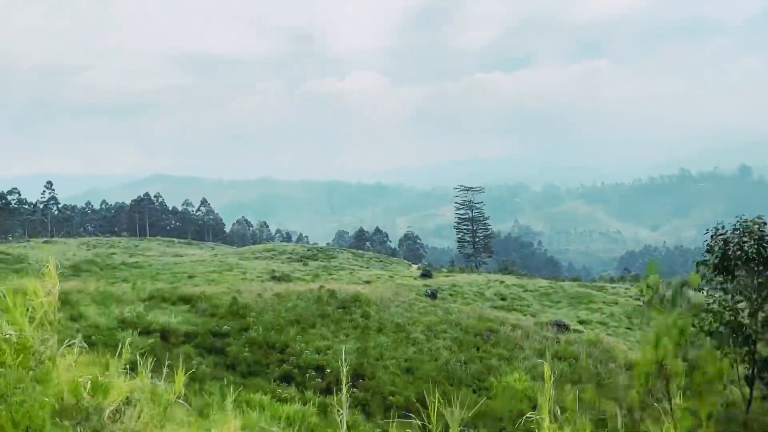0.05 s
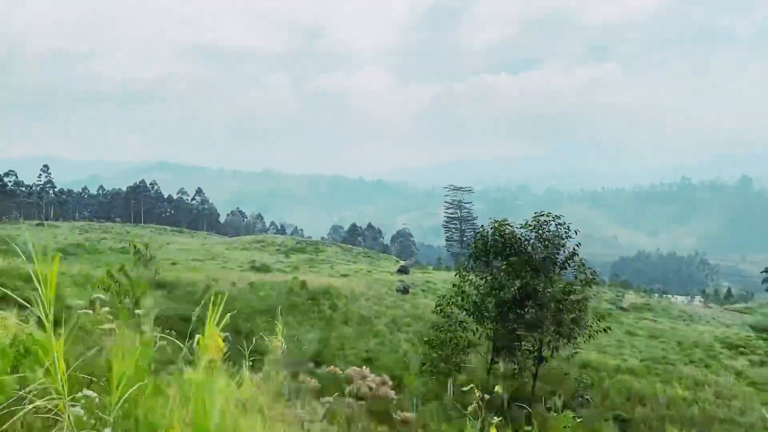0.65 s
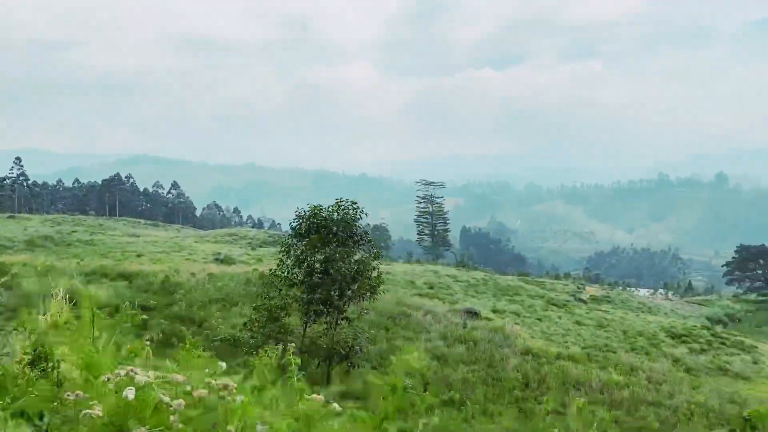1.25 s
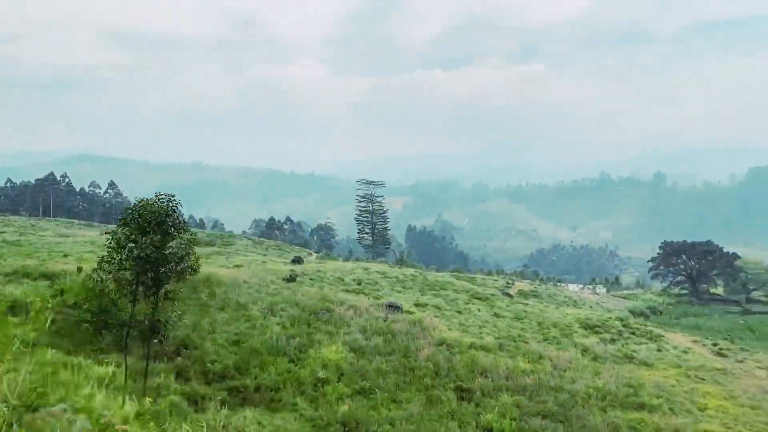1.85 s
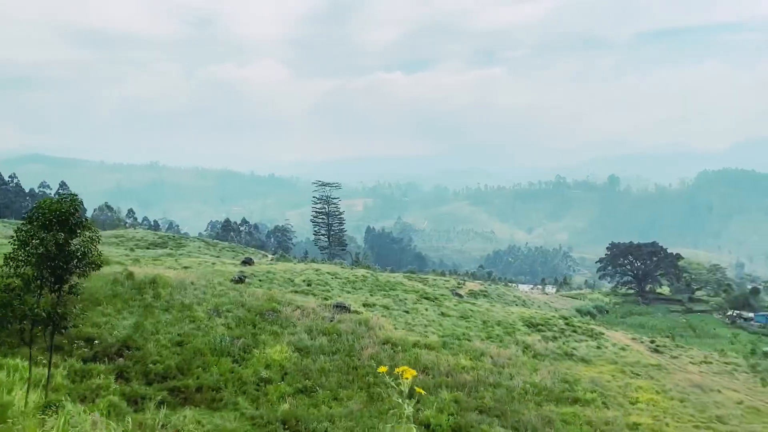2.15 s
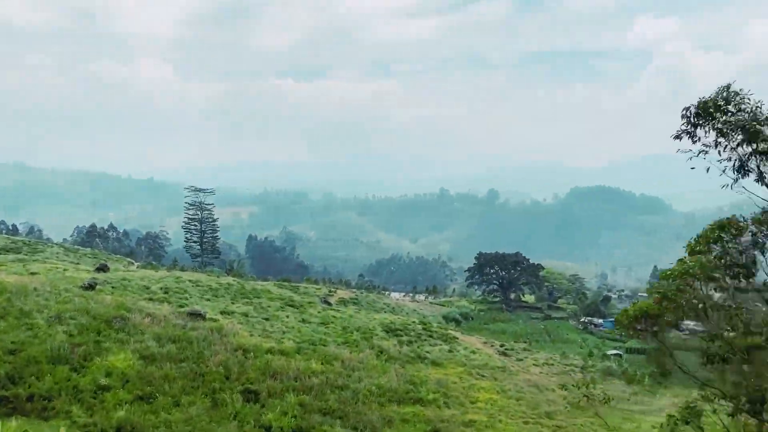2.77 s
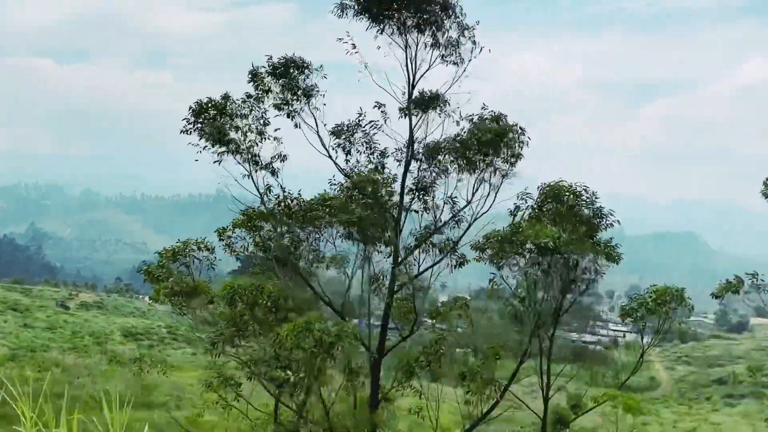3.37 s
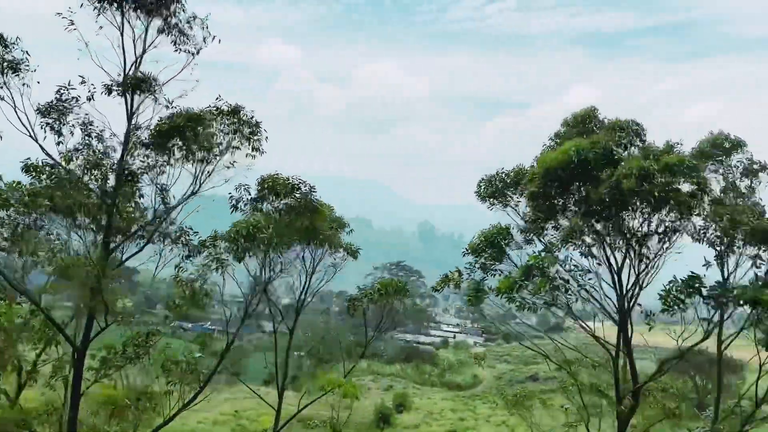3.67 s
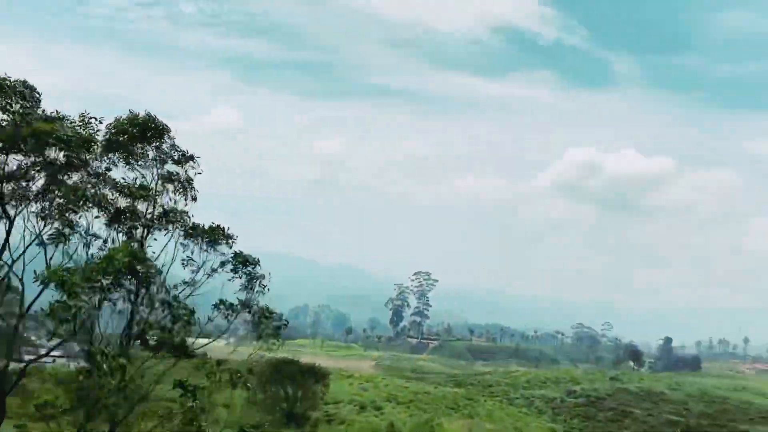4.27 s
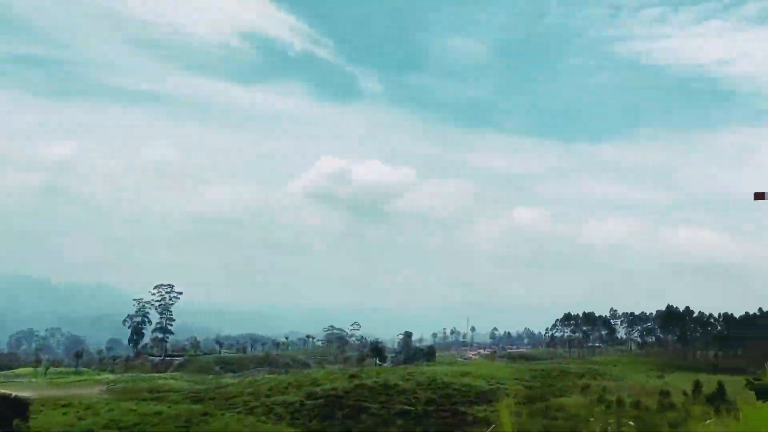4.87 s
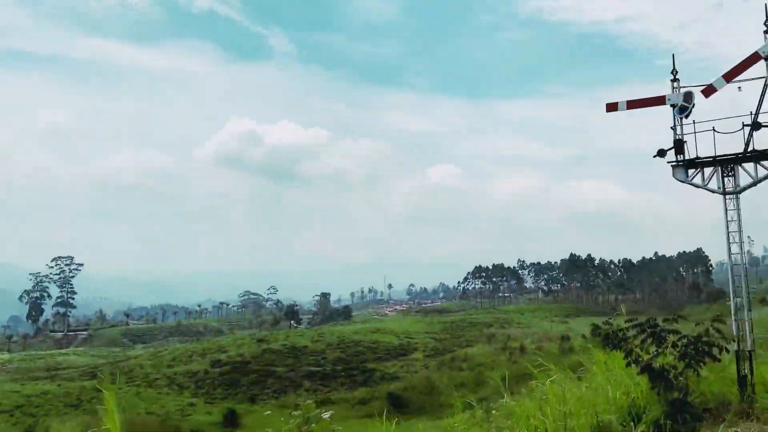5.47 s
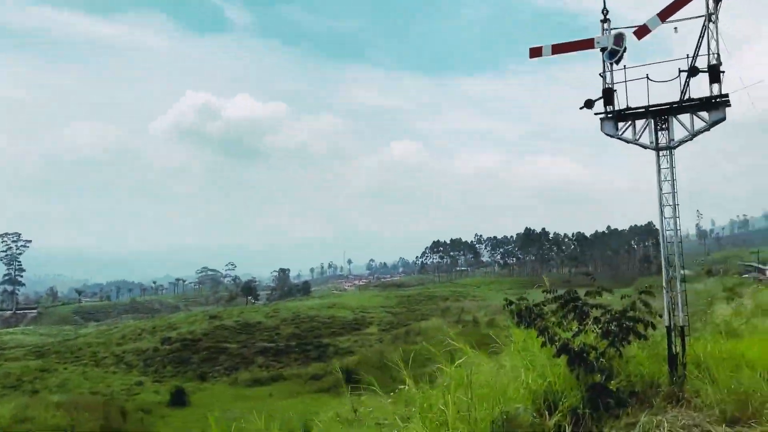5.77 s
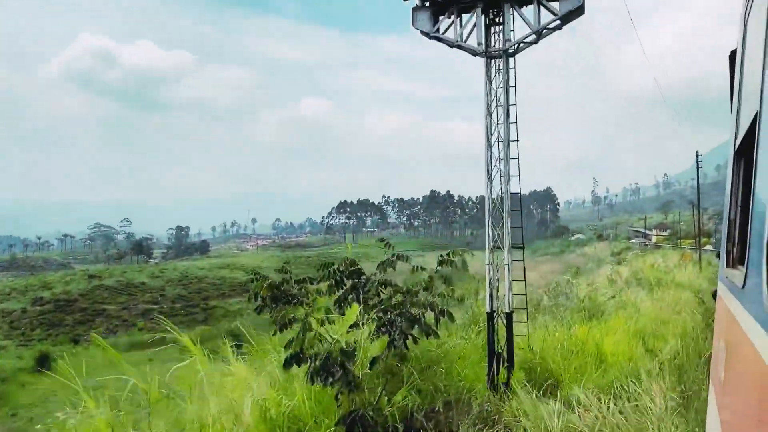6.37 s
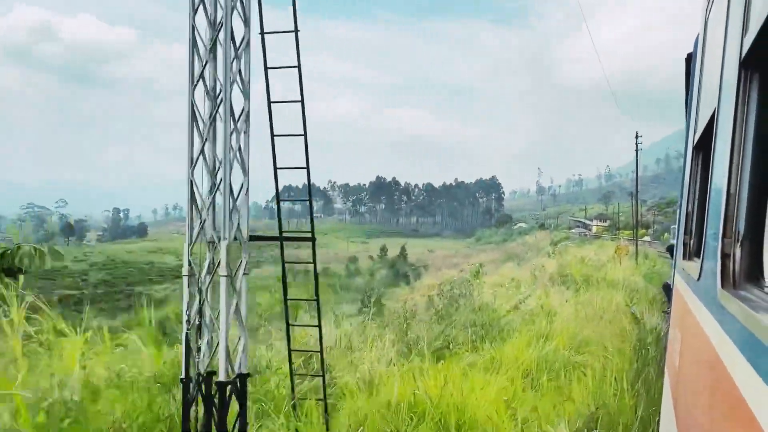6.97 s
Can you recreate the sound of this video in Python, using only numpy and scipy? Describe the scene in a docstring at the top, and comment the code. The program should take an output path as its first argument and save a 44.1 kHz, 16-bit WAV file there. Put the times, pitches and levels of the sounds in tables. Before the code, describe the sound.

A passenger train rumbles along, heard from an open window, with sharp irregular clacks at rail joints and wind buffeting the microphone.

```python
"""Jointed track from a train window

Stereo microphone at the open window of a passenger carriage, a short way above the wheels.
Wheels drop into the rail joints: a steel clack, a thud of the bogie and a hiss that dies slowly;
a squarely struck wheel clangs. Between the blows the wheels roar and loose gear rattles,
flanges squeak faintly on the rail, and the slipstream buffets the microphone."""
import sys
import numpy as np
from scipy import signal
from scipy.fft import rfft, irfft, next_fast_len
from scipy.io import wavfile
from scipy.ndimage import map_coordinates

SR = 44100
rng = np.random.default_rng(int(sys.argv[2]) if len(sys.argv) > 2 else 0)


def pcm_store(signal):
    """Save signal as 16-bit PCM."""
    levels = np.round(np.clip(np.atleast_2d(signal), -1, 1) * 32767)
    wavfile.write(sys.argv[1], SR, levels.astype(np.int16).T)


N = 313992
TIME = np.arange(N) / SR

# Levels are ahead of each layer's own gain; pan_db is left minus right.
# Wheel blows at rail joints, with smaller rattles and a scrape between them; a short rise is a hard knock:
# start_s, clack_db, clack_hz, rise_s, ring_t60_s, thud_db, hiss_db, hiss_tilt_db, pan_db
KNOCKS = [(0.032, -20, 855, 0.0079, 0.21, -25.5, -38, -1, 4.5),
          (0.101, -14, 750, 0.0036, 0.062, -30, -36.5, 2, 2),
          (0.178, -16.5, 800, 0.0032, 0.14, -26, -35, -2, 5),
          (0.263, -23, 874, 0.0083, .28, -25.5, -40, -2, 0.5),
          (0.323, -26, 920, 0.0074, .32, -22, -40, 1, 1),
          (0.425, -24.5, 750, 0.0011, 0.18, -26, -42, 1, 8.5),
          (0.665, -20.5, 890, 0.0018, 0.3, -19.5, -31, 3, 8),
          (0.726, -18.5, 760, 0.0015, 0.14, -17.5, -52, 0, 4),
          (0.872, -24.5, 820, .011, 0.069, -31, -37.5, 4, 4),
          (0.938, -28.5, 890, 0.0025, 0.32, -24.5, -43, 6, 3),
          (0.994, -16.5, 754, 0.00298, 0.088, -15.5, -35.5, -1, 3),
          (1.095, -31, 796, 0.0096, 0.33, -27.5, -41.5, -5, 3),
          (1.373, -26.5, 850, .0016, 0.21, -21, -40.5, -3, 6),
          (1.546, -26, 720, 0.0017, 0.15, -17.5, -34, -6, 2),
          (1.762, -26, 730, 0.0013, 0.22, -25.5, -48.5, -6, 5),
          (1.809, -23.5, 775, 0.0019, 0.32, -28.5, -32.5, -4, 1),
          (2.122, -28, 1090, 0.0047, 0.16, -18, -37.5, -8, 4),
          (2.296, -40, 940, 0.0032, 0.27, -30, -43.5, -10, 0),
          (2.331, -45, 1000, 0.0069, 0.18, -30, -45.5, -3, -1),
          (2.578, -19.5, 940, 0.0055, 0.21, -24, -32, -3.5, 3),
          (2.851, -17.5, 810, 0.002, 0.13, -23, -35, 0, 3),
          (3.026, -15, 646, 0.0014, 0.27, -17.5, -36.5, -9, 4.5),
          (3.301, -21.5, 940, .004, 0.3, -21, -35.5, -1, 3),
          (3.61, -23.5, 820, 0.00387, 0.24, -20.5, -34, -6, 0),
          (3.779, -42, 697, 0.0024, 0.087, -36, -59, 0, 2),
          (3.805, -31, 815, 0.0096, 0.36, -33.5, -42.5, -4, 0),
          (3.962, -30.5, 650, .002, .05, -32, -60, 0, -2), (4.031, -36.5, 800, 0.0022, .04, -40, -60, 0, 0),
          (4.067, -23, 1070, 0.0075, 0.24, -24.5, -33.5, -3, 1),
          (4.19, -34, 1060, 0.0076, 0.12, -44, -43.5, -7, 2),
          (4.274, -30.5, 930, .003, 0.035, -32.5, -63, -5, 2.5),
          (4.345, -19.5, 1040, 0.00213, 0.1, -22, -35, 2.5, 5),
          (4.539, -21, 800, 0.0063, 0.24, -16.5, -39.5, 1.5, 1.5),
          (4.8, -22.5, 890, 0.019, 0.26, -16, -37, -2, 4.5),
          (4.974, -46, 610, 0.0066, 0.23, -26, -53, -13, -3),
          (5.012, -45, 1400, .008, 0.091, -26, -52, -10, 0),
          (5.123, -21, 1050, .006, 0.16, -20.5, -31.5, -1, 3),
          (5.251, -34.5, 760, 0.0076, 1, -32.5, -48, 3, -1),
          (5.417, -38, 1080, 0.0019, 0.077, -36, -43.5, 1, 8),
          (5.59, -15.5, 725, 0.0042, 0.29, -17.5, -30, 0.5, 2),
          (5.762, -38, 1010, 0.0049, 0.2, -35, -38, 0, 1),
          (5.868, -16, 990, 0.0018, 0.17, -15.5, -29, -4, 2.5),
          (6.004, -25.5, 820, 0.00067, 0.14, -18.5, -48, -2, 6),
          (6.047, -27.5, 800, 0.0033, 0.087, -25.5, -52, 0, 2),
          (6.076, -28.5, 840, 0.0017, 0.13, -19.5, -41, -5, 2),
          (6.098, -29, 900, .002, 0.47, -30, -42, -1, 0), (6.204, -40, 650, 0.0029, 0.1, -23, -64, 0, -6),
          (6.252, -35, 940, 0.0054, 0.24, -40, -40.5, 3, 2),
          (6.279, -29.5, 670, .0021, 0.042, -22.5, -55, 0, 5),
          (6.321, -23.5, 687, .0014, 0.14, -14, -38, -6, 5),
          (6.342, -23.5, 835, .019, 0.22, -29, -37, 0, 2), (6.596, -35, 870, 0.0096, 0.24, -20, -34, -4, 5),
          (6.669, -27, 1010, 0.003, .24, -32, -36, -2, 11), (6.775, -49, 650, .02, .24, -21, -55, 13, -2),
          (6.951, -36, 905, .0018, .12, -52, -41, 6, 4),
          (7.076, -23.5, 1080, 0.0026, 0.24, -11, -29.5, -2, 3)]
# Squarely struck wheels: start_s, low_db, low_hz, high_db, high_hz
WHEEL_CLANGS = [(0.101, -28, 515, -29, 1610), (.18, -21.5, 515, -33, 1140), (.335, -37, 1320, -34, 1912),
                (0.424, -25, 450, -38, 935), (.665, -25, 935, -35, 1900), (.995, -21.5, 980, -32, 1912),
                (2.583, -42, 935, -41, 1330), (2.852, -21.5, 730, -24.5, 1912), (3.026, -22, 515, -30, 745),
                (4.074, -31, 1140, -33, 2930), (4.346, -24.5, 945, -23, 1640), (4.83, -34, 730, -36, 1912),
                (5.128, -28, 1140, -34, 3290), (5.598, -27, 510, -49, 1912), (5.872, -25, 1330, -25, 1890),
                (5.419, -43, 1140, -42, 1610), (6.67, -36, 935, -27, 1340)]
# Modes of a steel wheel: pitch_hz, level_db, t60_s
WHEEL_MODES = [(455, -2, .1), (515, -2, .09), (730, -2, .08), (935, 0, .08), (1140, -3, .06),
               (1330, -5, .04), (1615, -5, .06), (1908, -5, .13), (2280, -6, .06), (2490, -6, .05),
               (2950, -6, .035), (3290, -7, .1)]
# The ride between the blows: time_s, rumble_db, roar_db, rail_hiss_db
RIDE_LEVELS = [(0.0, -18, -22.5, -36), (0.26, -25, -26.5, -37), (0.46, -24.5, -32.5, -45.5),
               (0.54, -25.5, -33.5, -42.5), (0.63, -26.5, -33.5, -49), (0.85, -25, -26, -35.5),
               (1.31, -25.5, -33, -45.5), (1.48, -34.5, -33, -42), (1.92, -25.5, -37, -43.5),
               (2.27, -27, -37, -45), (2.45, -20.5, -34, -45.5), (2.74, -38, -33, -41),
               (3.11, -29, -33, -40.5), (3.55, -31, -31, -47), (3.88, -31.5, -36, -43.5),
               (4.02, -37, -33, -48), (4.42, -35.5, -35, -37.5), (4.75, -28, -32.5, -45.5),
               (5.3, -29.5, -32, -41.5), (5.52, -33, -35, -44), (5.81, -29, -27.5, -38.5),
               (6.09, -30, -32, -43.5), (6.23, -29, -31, -42.5), (6.68, -24, -26.5, -32.5),
               (6.82, -22.5, -27, -37.5), (7.12, -42, -30.5, -35.5)]
# Wind at the window: time_s, level_db
WIND_LEVELS = [(0.0, -41), (0.02, -42), (0.4, -37.5), (0.52, -29), (0.89, -36.5), (0.99, -30), (1.15, -41),
               (1.27, -26), (2.34, -21.5), (2.75, -40), (3.31, -36), (3.35, -26), (3.73, -26.5),
               (3.98, -28), (4.28, -35.5), (5.39, -27), (5.43, -34.5), (6.58, -32.5), (6.68, -36.5),
               (6.82, -27), (6.88, -45), (6.92, -30), (7.12, -35)]
# Gusts on the microphone: start_s, length_s, level_db, pan_db
MIC_GUSTS = [(1.941, 0.034, -27, -2), (2.064, 0.11, -23, -1), (2.226, 0.025, -23, -4),
             (2.304, 0.13, -24.5, 0), (3.327, 0.11, -17, -5), (3.427, 0.052, -18, -6), (3.925, .1, -22, -6)]
# Flanges on the rail: start_s, length_s, start_hz, end_hz, level_db, scrape_share
FLANGE_SQUEAKS = [(1.552, 0.088, 3350, 3360, -40.5, 0.6), (1.849, .035, 2500, 2540, -36, 0.55),
                  (1.944, 0.086, 3260, 3170, -46, 0.34), (1.977, .11, 1690, 1665, -43, 0.6),
                  (2.019, 0.041, 2850, 2660, -42, 0.7), (2.154, 0.046, 3600, 3600, -51, 0.3),
                  (2.511, 0.07, 1890, 1840, -35.5, 0), (4.994, .071, 3570, 3400, -45, 1)]

# Spectra of the sources: frequency_hz, level_db
CLACK_SPECTRUM = [(150, -21.5), (350, 0), (600, 5), (1000, -0.5), (1600, -6), (2400, -11), (4000, -22.5),
                  (7000, -42), (14000, -67)]  # steel on steel
HISS_SPECTRUM = [(500, -19), (1200, 3.5), (2800, 1), (3300, 1), (3700, -3), (4200, 0), (6500, -2),
                 (8000, -4), (9200, -14.5), (11000, -7.5), (13200, -13), (15500, -29)]  # rail, ballast and fittings
TREAD_SPECTRUM = [(100, -16), (400, 11.5), (700, 4.5), (1200, 1), (1800, -6), (2600, -15.5), (5000, -32),
                  (14000, -75)]  # rough treads rolling
RUMBLE_SPECTRUM = [(30, -33.5), (90, -8), (170, 3), (300, 1), (450, -7), (800, -27.5), (2000, -38),
                   (10000, -76)]  # the underframe
WIND_SPECTRUM = [(20, -37), (35, -9.5), (52, 3), (80, 2.5), (130, 0), (250, -12), (500, -25.5), (1200, -61),
                 (10000, -83)]  # eddies on the microphone
GUST_SPECTRUM = [(30, -28), (60, 9.5), (130, -1), (250, 0), (450, -1.5), (900, -28.5), (2500, -58),
                 (10000, -82)]  # the thump of a gust
FLUTTER_SPECTRUM = [(200, -10), (450, 0), (850, -9.5), (1300, -34), (2500, -33), (10000, -90)]  # a gust tearing

# Likeness of the sound at the two microphone ports: frequency_hz, correlation
PORT_LIKENESS = [(40, .92), (120, .7), (300, .7), (600, .36), (2000, .22), (5000, .28), (7000, .5),
                 (8600, .99), (9600, .99), (10800, .66), (12200, .95), (14000, .7)]
# Balance of the ports: frequency_hz, pan_db
PORT_BALANCE = [(120, 0), (300, .8), (700, 1.1), (1700, 1.3), (2100, .3), (2600, -4.2), (4200, -3),
                (5400, -1.4), (6000, 0), (7500, 1.8), (8300, 0)]
# Phase between the ports, opposite near 9 kHz: frequency_hz, left_lead_rad
PORT_PHASE = [(1400, 0), (2000, 2), (2700, -.4), (6700, 0), (8400, 2.9), (9600, 3.3), (11400, 6.2),
              (13700, 6.3)]

USUAL_CLACK_HZ, BRIGHTENING = 847, 1.7  # a clack's brightness grows faster than its pitch
THUD_HZ, USUAL_THUD_DB, SAG_OCTAVES_PER_DB = 286.4, -21, 0.025  # a heavier thud is deeper
CLANG_FOCUS_DB, CHATTER_FOCUS_DB = 60, 8  # loss per octave away from a wheel's favoured pitch
DULLING, NEUTRAL_WIND_DB = 0.11, -48  # top end lost per dB of wind above the neutral level


def knocks():
    """Wheel blows at rail joints and smaller rattles between them, each a clack, a thud and a hiss."""
    out, t = np.zeros((2, N)), np.arange(SR // 2) / SR
    for start, clack_db, clack_hz, rise, t60, thud_db, hiss_db, tilt_db, pan_db in KNOCKS:
        sag_octaves = SAG_OCTAVES_PER_DB * (USUAL_THUD_DB - thud_db)
        thud_hz = THUD_HZ * 2 ** sag_octaves * (1 + 0.049 * rng.standard_normal())
        lag_s = 0.00313 + .7 * rise  # the softer the start, the later the thud
        add(out, start, pan(pan_db) * set_onset(clack(t, clack_hz, rise, t60), clack_db))
        add(out, start + lag_s, pan(.4 * pan_db) * set_onset(thud(t, thud_hz, t60), thud_db + 1.33))
        add(out, start, set_onset(hiss(t, rise, 1.56 * t60, tilt_db), hiss_db + 5))
    return out


def clack(t, hz, rise, t60):
    """Steel hits steel: first contact and loose chatter ring rail and wheel; the rail end snaps down."""
    hardness = .004 / (rise + .002)
    first_contact = undb(11) * hardness * swell(t, rise / 2, t60=0.0077)
    contact = swell(t, rise, t60) + first_contact
    force = noise(len(t)) * contact * undb(2.5 * wander(300, len(t)))
    shift = (hz / USUAL_CLACK_HZ) ** BRIGHTENING  # a stiffer contact lifts the whole spectrum
    rail = colour(force, [(f * shift, db) for f, db in CLACK_SPECTRUM])
    rail = underframe_echoes(rail + undb(-17) * resonate(rail, hz, q=2.5))
    snap = np.sin(2 * np.pi * hz * t) * swell(t, rise=.001, t60=.022)
    ring = wheel_ring(noise(len(t)) * contact, favoured_hz=1630)
    return unit(rail) + undb(-10) * hardness * unit(snap) + undb(-14) * ring


def underframe_echoes(x):
    """Four echoes off the underframe, within 3 ms, give each blow its own hollow colour."""
    earliest_s, latest_s = .0006, .003
    echoes = np.zeros(int(latest_s * SR) + 1)
    echoes[0] = 1
    echoes[(rng.uniform(earliest_s, latest_s, size=4) * SR).astype(int)] = undb(-8)
    return signal.fftconvolve(x, echoes[None])[:, :x.shape[-1]]


def thud(t, hz, t60):
    """The bogie takes the blow: a few cycles of its springs and a boom of the body."""
    spring_hz = hz * (1 + 0.014 * rng.standard_normal())
    springs = np.sin(2 * np.pi * spring_hz * t) * swell(t, 0.0017, min(t60, .07))
    push = noise(len(t)) * swell(t, 0.0027, t60)
    boom = resonate(resonate(push, hz, q=1.0), hz, q=0.99)
    return undb(-7.5) * unit(springs) + unit(boom)


def hiss(t, rise, t60, tilt_db):
    """The jolt shakes rail, ballast and fittings: a late, lingering hiss and a thin ring of the rail."""
    linger = undb(-32) * swell(t, rise=0.048, t60=0.77)
    shake = swell(t, rise + 0.0044, t60) + linger
    grit = colour(noise(len(t)) * shake * undb(1.26 * wander(178.7, len(t))), HISS_SPECTRUM)
    ring = resonate(noise(len(t)) * shake, 3200 * (1 + .04 * rng.standard_normal()), q=35)
    return unit(colour(grit, [(4000, 0), (11000, tilt_db)])) + undb(-17) * unit(ring)


def clangs():
    """Left of the microphone, a short push sets a wheel ringing in a lower and a higher tone."""
    out, t = np.zeros((2, N)), np.arange(SR // 3) / SR
    for start, low_db, low_hz, high_db, high_hz in WHEEL_CLANGS:
        for db, hz in (low_db, low_hz), (high_db, high_hz):
            push = rng.standard_normal(len(t)) * swell(t, rise=.001, t60=.022)
            add(out, start, pan(3) * set_onset(wheel_ring(push, hz, CLANG_FOCUS_DB), db))
    return out


def wheel_ring(force, favoured_hz, focus_db=CHATTER_FOCUS_DB):
    """A steel wheel rings in its modes, most near the favoured pitch; no two wheels are quite alike."""
    out = 0
    for hz, db, t60 in WHEEL_MODES:
        strike, detune = rng.standard_normal(2)  # where it is struck decides how each mode speaks
        mode = resonate(force, hz * (1 + .008 * detune), q=np.pi * hz * t60 / np.log(1000))
        octaves_away = abs(np.log2(hz / favoured_hz))
        out = out + unit(mode) * undb(db + 3 * strike - focus_db * octaves_away)
    return unit(out)


def rolling():
    """Below the window the underframe rumbles, the treads roar and the rail head hisses with grit."""
    times, *levels = np.transpose(RIDE_LEVELS)
    rumble_db, roar_db, hiss_db = (np.interp(TIME, times, level) for level in levels)
    rumble = unit(colour(noise(N) * undb(2.17 * wander(45)), RUMBLE_SPECTRUM))
    bumps = unit(resonate(colour(jolts(per_s=16, t60=0.039), RUMBLE_SPECTRUM), 266, q=2.9))
    underframe = undb(0.5) * rumble + undb(-4) * bumps
    roar = tread_roar()
    flicker = noise(N) * undb(1.3 * wander(22))
    grit = undb(-7) * unit(jolts(per_s=76, t60=0.045))
    rail_hiss = unit(colour(flicker + grit, HISS_SPECTRUM))
    return undb(rumble_db) * underframe + undb(roar_db + 1.5) * roar + undb(hiss_db - 0.5) * rail_hiss


def tread_roar():
    """Rough treads roar and keep the wheels singing, while loose gear rattles."""
    roughness = noise(N) * undb(2 * wander(55) + 0.81 * wander(9.4))
    roar = unit(colour(roughness, TREAD_SPECTRUM))
    rattle = unit(colour(jolts(per_s=34, t60=0.023), CLACK_SPECTRUM))
    singing = wheel_ring(noise(N), favoured_hz=1720)
    high_ring = wheel_ring(noise(N) * undb(5 * wander(9)), favoured_hz=3290, focus_db=CLANG_FOCUS_DB)
    return undb(-1.33) * roar + undb(-12.5) * rattle + undb(-21) * singing + undb(-26.5) * high_ring


def slipstream(wind_db):
    """Eddies thump right on the microphone; the stronger a gust, the more it tears into a flutter."""
    out = unit(colour(noise(N) * undb(3.2 * wander(28)), WIND_SPECTRUM)) * undb(wind_db + 4)
    for start, length, db, pan_db in MIC_GUSTS:
        size = int(length * SR)
        eddies = noise(size) * signal.windows.tukey(size, .4) * undb(3.5 * wander(91.4, size))
        thump = unit(colour(eddies, GUST_SPECTRUM)) * undb(db)
        flutter = unit(colour(eddies, FLUTTER_SPECTRUM)) * undb(2 * db + 16)
        add(out, start, thump + pan(pan_db) * flutter)
    return out


def flange_squeaks():
    """Faint under the ride, a flange scrapes the rail and swells into a brief, unsteady note."""
    out = np.zeros((2, N))
    for start, length, start_hz, end_hz, db, rough in FLANGE_SQUEAKS:
        size = int(length * SR)
        hz = np.linspace(start_hz, end_hz, size) * (1 + .007 * wander(400, size))
        arch = np.sin(np.pi * np.linspace(0, 1, size) ** 1.3)  # swells slowly, stops quickly
        grip = arch * undb(3.8 * rough * wander(170, size))
        note = unit(np.sin(2 * np.pi * np.cumsum(hz) / SR))
        scrape = unit(resonate(noise(size), start_hz, q=12))
        add(out, start, undb(db) * unit(grip * ((1 - rough) * note + rough * scrape)))
    return out


def jolts(per_s, t60):
    """Noise in short bursts at random moments, mostly small and now and then large."""
    moment, strength = rng.random((2, N))
    impulses = (moment < per_s / SR) * undb(-3 * np.log(strength + 0.011))
    t = np.arange(SR // 8) / SR
    return noise(N) * signal.fftconvolve(impulses, swell(t, 0.0016, t60))[:N]


def noise(size):
    """White noise at both ports, most alike in the bass and at the very top."""
    even = next_fast_len(size // 2 + 1) * 2
    likeness = np.clip(on_bins(PORT_LIKENESS, even), 0, 1)
    mid, side = rfft(rng.standard_normal((2, even))) * np.sqrt([1 + likeness, 1 - likeness])
    return unit(irfft([mid + side, mid - side])[:, :size])


def wander(rate_hz, size=N):
    """Smooth random drift with a spread near 1."""
    steps = rng.standard_normal(4096)
    return map_coordinates(steps, [np.arange(size) * rate_hz / SR], order=2, mode="wrap")


def swell(t, rise, t60):
    """Envelope that builds up, then dies away."""
    return (1 - np.exp(-(t / rise) ** 2)) * np.exp(-np.log(1000) * t / t60)


def colour(x, spectrum):
    """Minimum-phase filter with a spectrum given as frequency_hz, level_db."""
    size = next_fast_len(x.shape[-1] // 2 + 1024) * 2
    cepstrum = irfft(np.log(undb(on_bins(spectrum, size))))
    cepstrum[1:size // 2] *= 2
    cepstrum[size // 2 + 1:] = 0
    return irfft(rfft(x, size) * np.exp(rfft(cepstrum)))[..., :x.shape[-1]]


def on_bins(points, size):
    """A table over frequency, read at the bins of a transform."""
    hz, value = np.transpose(points)
    return np.interp(np.log(np.arange(size // 2 + 1) * SR / size + 1), np.log(hz), value)


def resonate(x, hz, q):
    """One resonance, gain 1 at its centre."""
    return signal.lfilter(*signal.iirpeak(min(hz, SR / 3), max(q, .5), SR), x)


def undb(db):
    """Decibels to gain."""
    return 10 ** (np.asarray(db) / 20)


def unit(x):
    """Scale to rms 1."""
    return x / np.sqrt(np.mean(x ** 2) + 1e-20)


def pan(db):
    """Channel gains for a left minus right level."""
    return undb(np.array([[db], [-db]]) / 2)


def set_onset(x, db):
    """Scale a sound so that its first 40 ms have the given rms level."""
    return x * undb(db) / np.sqrt(np.mean(x[..., :int(.04 * SR)] ** 2))


def add(out, start_s, sound):
    """Mix a sound in at its start time."""
    start = max(int(start_s * SR), 0)
    out[:, start:start + sound.shape[-1]] += sound[..., :max(N - start, 0)]


def scene():
    """Train and wind as they reach the window; the train's top end dulls as the wind rises."""
    wind_db = np.interp(TIME, *np.transpose(WIND_LEVELS))
    top_db = -DULLING * (wind_db - NEUTRAL_WIND_DB)
    train = knocks() + clangs() + rolling()
    top = signal.sosfiltfilt(signal.butter(2, 8000, "high", fs=SR, output="sos"), train)
    return train + (undb(top_db) - 1) * top + slipstream(wind_db) + flange_squeaks()


def record(dry):
    """Each microphone port has its own colour and phase; peaks are rounded and the top is cut."""
    size = next_fast_len(N // 2 + 1024) * 2
    left = undb(on_bins(PORT_BALANCE, size) / 2) * np.exp(.5j * on_bins(PORT_PHASE, size))
    ports = irfft(rfft(dry, size) * np.array([left, 1 / left]))[:, :N]
    rounded = np.tanh(0.74 * ports) / 0.84
    return signal.sosfilt(signal.ellip(8, .2, 70, 14400, fs=SR, output="sos"), rounded)


dry = scene()
out = record(dry)
pcm_store(out)
```